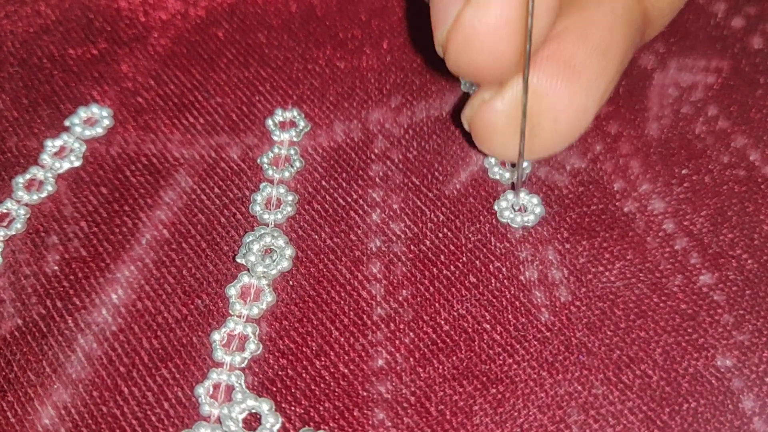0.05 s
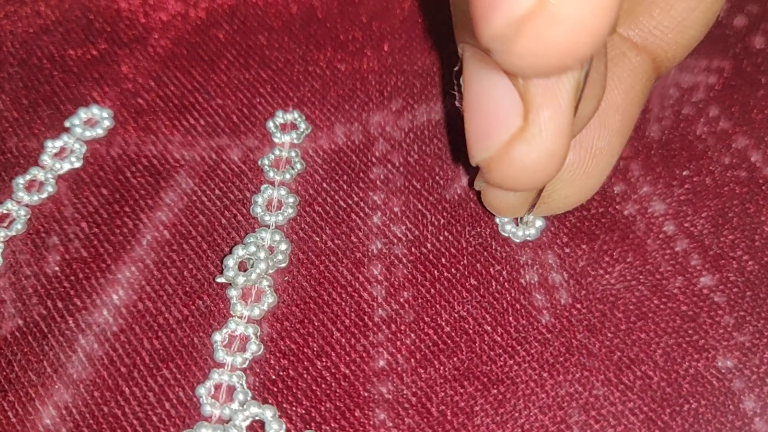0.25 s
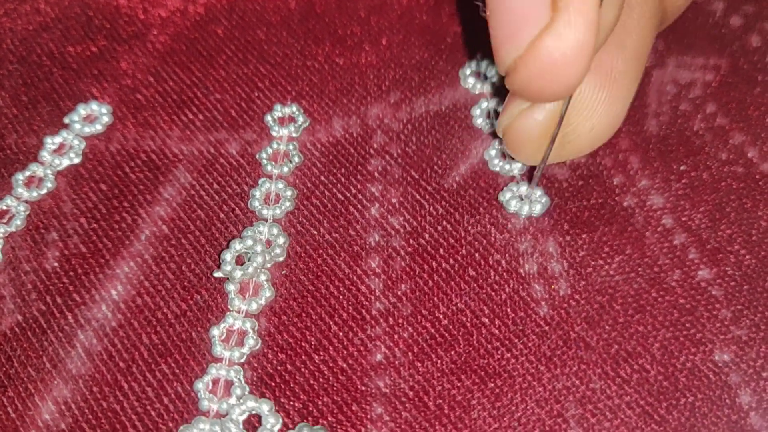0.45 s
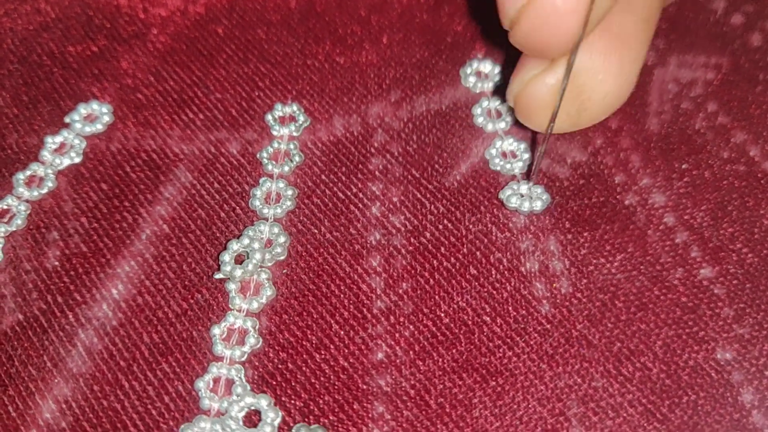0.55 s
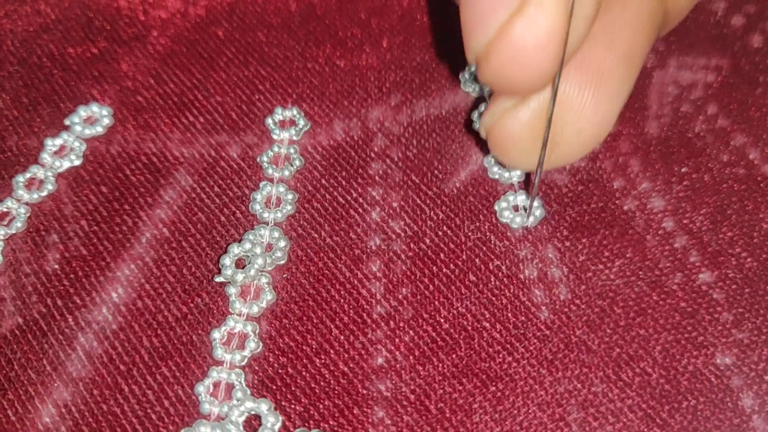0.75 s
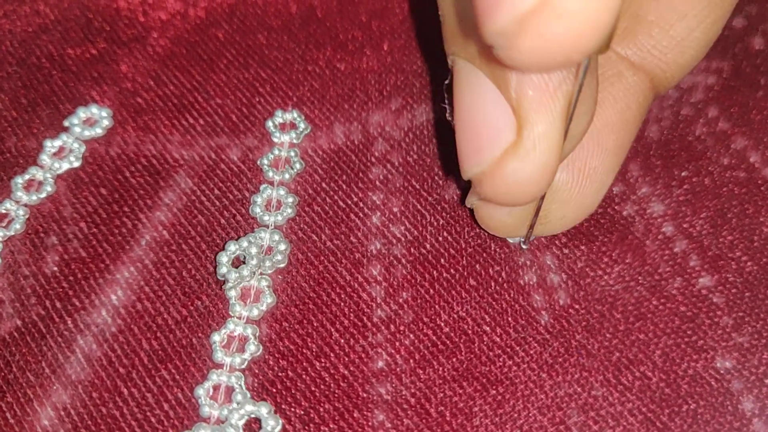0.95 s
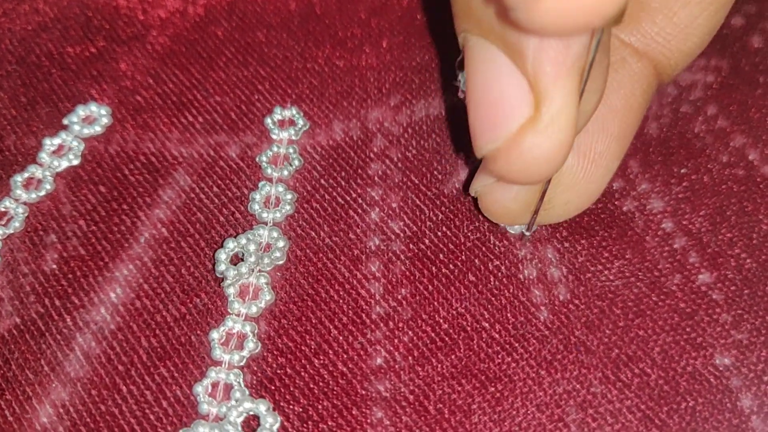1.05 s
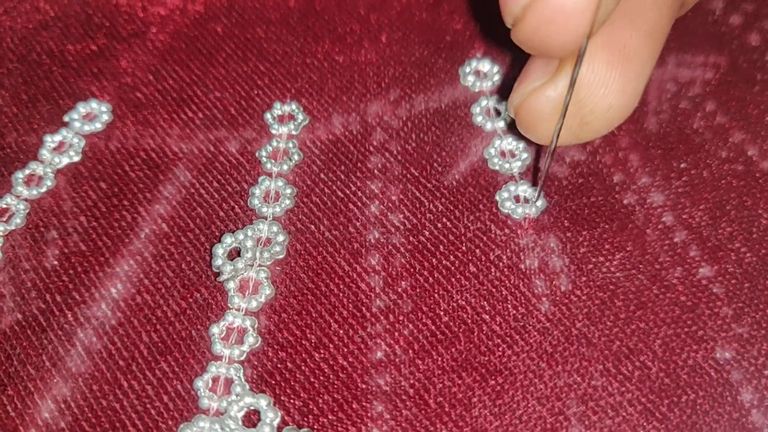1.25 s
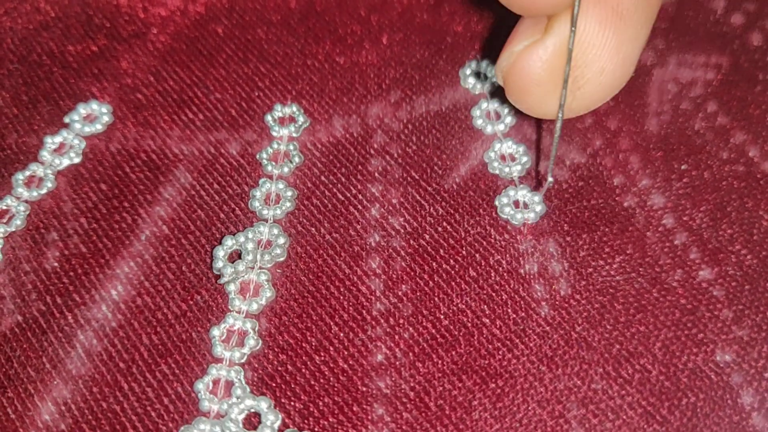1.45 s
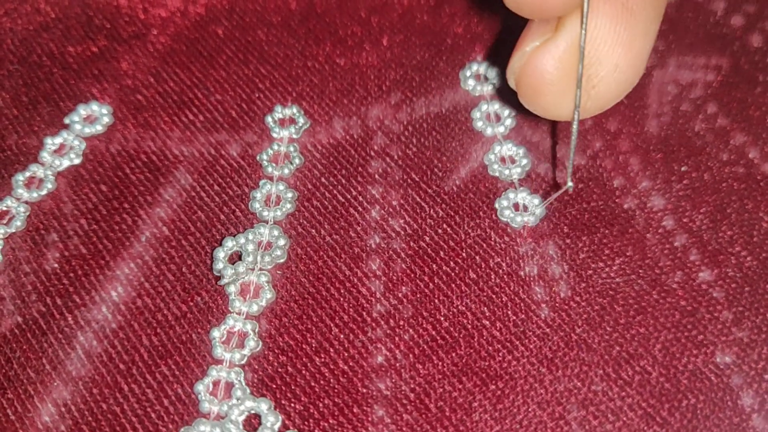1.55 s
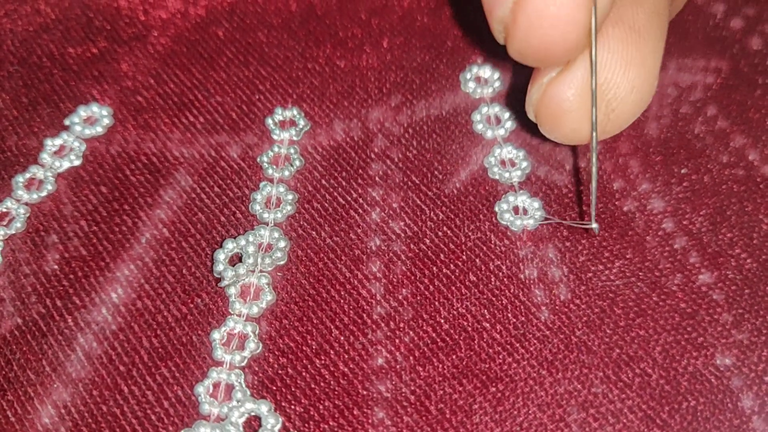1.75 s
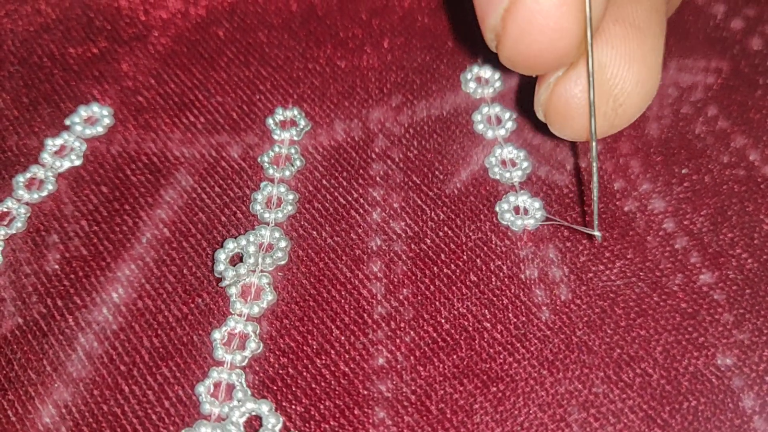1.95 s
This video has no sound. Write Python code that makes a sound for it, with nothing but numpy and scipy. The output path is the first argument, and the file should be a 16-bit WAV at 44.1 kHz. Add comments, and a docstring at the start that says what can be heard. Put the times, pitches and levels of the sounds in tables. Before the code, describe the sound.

A needle pops through taut fabric four times, with dry ticks and soft thumps.

```python
"""A quiet room, close to cloth stretched on an embroidery frame. A needle is pushed down and up, twice.
Each puncture snaps the threads and lets the cloth ring like a slack drum; the shaft then rasps through
the hole and slips free with a tick. The frame sways and rumbles under the hand. At the end the thread
is drawn up softly and the frame takes a light knock."""
import sys
import numpy as np
from scipy import signal
from scipy.fft import rfft, irfft
from scipy.io import wavfile

SR = 44100
rng = np.random.default_rng(int(sys.argv[2]) if len(sys.argv) > 2 else 0)


def unload_wav(signal):
    """Save mono or channel-first audio to the path in sys.argv[1] as 16-bit WAV at rate SR, clipped to [-1, 1]."""
    wavfile.write(
        sys.argv[1],
        SR,
        np.round(np.clip(np.atleast_2d(signal).T, -1, 1) * 32767).astype(np.int16),
    )


N = 88200


def undb(db):
    return 10 ** (np.asarray(db) / 20)


def unit(x):
    return x / np.std(x)


def since(start_s):
    """Seconds since start_s, zero before."""
    return np.maximum(np.arange(N) / SR - start_s, 0)


def swell(centre_s, half_s):
    """Gaussian rise and fall."""
    return np.exp(-((np.arange(N) / SR - centre_s) / half_s) ** 2)


def click(start_s):
    """One-sample impulse."""
    return np.diff(1. * (since(start_s) > 0), prepend=0)


def pan(right_db):
    """Left and right gains, left at unity."""
    return np.array([[1.], [undb(right_db)]])


def colour(x, points, size=8192):
    """Minimum-phase filter through (f/Hz, level/dB) points."""
    hz, db = np.array(points, float).T
    bins_hz = np.maximum(np.arange(size // 2 + 1) * SR / size, 1)
    gain = undb(np.interp(np.log(bins_hz), np.log(hz), db))
    cepstrum = irfft(np.log(gain))
    cepstrum[1:size // 2] *= 2
    cepstrum[size // 2 + 1:] = 0
    return signal.fftconvolve(x, irfft(np.exp(rfft(cepstrum))))[:N]


def fibre_noise(spectrum, catches_per_s=8000, roughness=0.15):
    """Friction as dense, uneven catches of fibres; rms 1."""
    hits = rng.random(N) < catches_per_s / SR
    catches = hits * rng.standard_normal(N) * np.exp(roughness * rng.standard_normal(N))
    return unit(colour(catches, spectrum))


def ring(modes, start_s, release_s, tilt_db_per_oct=0):
    """Modes swing freely once a load lets go. The right lags by a travel time, plus phase in the lows."""
    length_s, right_lag_s, low_lag_rad, low_corner_hz = 0.3, 0.00022, 0.8, 200
    first = int(start_s * SR)
    span = np.arange(first, min(first + int(length_s * SR), N))
    t = np.maximum(span / SR - start_s - np.array([[0], [right_lag_s]]), 0)
    out = np.zeros((2, N))
    for hz, db, t60_s, right_db in modes:
        gain = pan(right_db) * undb(db + tilt_db_per_oct * np.log2(hz / 1000))
        lag_rad = np.array([[0], [low_lag_rad]]) / (1 + (hz / low_corner_hz) ** 4)
        out[:, span] += gain * np.cos(2 * np.pi * hz * t - lag_rad) * undb(-60 * t / t60_s)
    out[:, span] *= 1 - np.exp(-t / release_s)
    return out


# Room tone spectra: f/Hz, level/dB
AIR_LEFT = [(20, 22.5), (60, 5.5), (120, 1), (250, -4), (480, -7.5), (700, -7.5), (1000, -7), (2000, -15),
            (4500, -19), (6300, -12), (7500, -23.5), (10500, -29), (15500, -30.5)]
AIR_RIGHT = [(20, 21.5), (60, 26), (120, 5.5), (250, -5), (480, -3), (700, -14), (1000, -10.5),
             (2000, -16.5), (4500, -18.5), (6300, -20.5), (8700, -23.5), (10500, -29), (15500, -29)]
# Far tones: t/s, half-length/s, f/Hz, level/dB
FAR_TONES = [(0.842, 0.11, 1085, -65.5), (1.51, 0.13, 472, -60)]


def room(air_db=-43, shared_power=0.45, shared_below_hz=800, hum_hz=100, hum_db=-54):
    """Room tone, its lows partly common to both sides, with mains hum and two faint far tones."""
    t = since(0)
    lowpass = signal.butter(2, shared_below_hz, fs=SR, output="sos")
    shared = np.sqrt(shared_power) * signal.sosfilt(lowpass, rng.standard_normal(N))
    air = np.array([colour(shared + np.sqrt(1 - shared_power) * rng.standard_normal(N), side)
                    for side in (AIR_LEFT, AIR_RIGHT)])
    hum = undb(hum_db) * np.sin(2 * np.pi * hum_hz * t)
    tones = sum(undb(db) * swell(centre_s, half_s) * np.sin(2 * np.pi * hz * t)
                for centre_s, half_s, hz, db in FAR_TONES)
    return undb(air_db) * unit(air) + hum + tones


# Sliding thread spectrum: f/Hz, level/dB
THREAD_SPECTRUM = [(300, -40), (1000, 14), (3000, 6.5), (6000, 9.5), (8500, 3.5), (10500, -7.5),
                   (15500, -1)]


def thread_draw(centre_s=2, half_s=0.3, level_db=-62.5):
    """Thread hisses as it is drawn up through the cloth."""
    hiss = np.array([fibre_noise(THREAD_SPECTRUM) for _ in range(2)])
    return undb(level_db) * swell(centre_s, half_s) * hiss


# Rub strokes: t/s, half-length/s, level/dB
RUB_STROKES = [(0.028, 0.14, -54.5), (0.128, 0.0057, -50), (0.48, 0.03, -48), (1.055, 0.023, -56),
               (1.178, 0.021, -44.5)]
# Rub spectrum: f/Hz, level/dB
RUB_SPECTRUM = [(100, 9.5), (400, 4.5), (900, 4), (1400, -6.5), (3000, -17.5), (6300, -21.5), (9000, -29.5),
                (15500, -50)]


def rubbing():
    """Needle tip and fingers feel over the cloth."""
    envelope = sum(undb(db) * swell(centre_s, half_s) for centre_s, half_s, db in RUB_STROKES)
    return pan(right_db=-9.5) * envelope * fibre_noise(RUB_SPECTRUM)


# Frame modes: f/Hz, level/dB, t60/s, right-left/dB
FRAME_MODES = [(464, -2, .035, 1), (525, -1.5, 0.012, 0.5), (1100, -20, .008, -1), (3300, -5.5, .007, -4)]


def frame_knock(level_db=-32.5):
    """A light knock rings the frame."""
    return undb(level_db) * ring(FRAME_MODES, start_s=1.9705, release_s=0.0001)


# Needle and finger presses from below: t/s, half-length/s, level/dB
CLOTH_PRESSES = [(0.521, 0.014, -7.5), (0.622, 0.003, -20), (1.217, 0.013, -6.5)]


def frame_motion(sway_hz=12, crest_s=0.19, sway_db=-13, rumble_db=-25.5):
    """Each push sets the frame swaying and rumbling, mostly on the left; presses bulge the cloth."""
    def shaken(decay_s, rise_s=0.0041):
        ages = [since(start_s) for start_s, *_ in STITCHES]
        return sum((1 - np.exp(-t / rise_s)) * np.exp(-t / decay_s) for t in ages)

    # f/Hz, level/dB
    spectrum = [(5, -14), (14, -37), (20, 3.5), (45, -1.5), (65, -11.5), (90, -20), (130, -31.5),
                (300, -38.5), (1000, -94)]
    noise = unit(colour(rng.standard_normal(N), spectrum))
    rumble = undb(rumble_db) * noise * (0.11 + shaken(decay_s=0.17))
    swing = np.cos(2 * np.pi * sway_hz * (since(0) - crest_s))
    sway = undb(sway_db) * swing * (0.12 + shaken(decay_s=0.24))
    bulge = sum(undb(db) * swell(centre_s, half_s) for centre_s, half_s, db in CLOTH_PRESSES)
    return pan(right_db=-27) * (sway + rumble - bulge)


# Shaft rasp spectrum: f/Hz, level/dB
RASP_SPECTRUM = [(200, 10.5), (900, 5), (2000, 3.5), (3200, -1.5), (4500, -2), (6400, 5), (7500, -6.5),
                 (9000, -11.5), (10300, -44), (15500, -39)]


def shaft_rasp(stop_s=0.0036, trail_db=-57, trail_fade_db_per_s=60):
    """The shaft rasps in the hole; thread runs on softly after a downward stitch."""
    envelope = 0
    for start_s, direction, *_, rasp_db, length_s, fade_db_per_s in STITCHES:
        t = since(start_s)
        shaft = undb(rasp_db - fade_db_per_s * t) * np.exp(-since(start_s + length_s) / stop_s)
        trail = (direction > 0) * undb(trail_db - trail_fade_db_per_s * t)
        envelope += (t > 0) * (shaft + trail)
    return pan(right_db=-14) * envelope * fibre_noise(RASP_SPECTRUM)


# Tip click spectrum: f/Hz, level/dB
TIP_SPECTRUM = [(200, -39), (6000, -30), (9000, 12.5), (11000, -10), (13000, -2), (15000, -2), (16300, -2)]


def tip_click(start_s):
    """The needle tip gives one bright click."""
    return colour(click(start_s), TIP_SPECTRUM)


# Thread snap spectra: f/Hz, level/dB
SNAP_SPECTRUM_LEFT = [(200, -16), (800, 2.5), (1800, -16.5), (2400, -0.5), (2800, -11), (3500, -2.5),
                      (5000, -7.5), (6200, 6.5), (7200, -6.5), (8400, -19), (10000, -49), (15500, -29.5)]
SNAP_SPECTRUM_RIGHT = [(200, 5.5), (800, -4.5), (1800, -17), (3500, -25), (5000, -24.5), (6200, -11),
                       (7500, -9.5), (8800, -8), (10200, -38), (15500, -44.5)]


def thread_snap(start_s, decay_s, break_gain=2.27):
    """Threads snap aside: one sharp break, then a tiny burst of fibres."""
    t = since(start_s)
    fibres = (t > 0) * np.exp(-t / decay_s) * np.sign(rng.standard_normal(N))
    crack = break_gain * click(start_s) + fibres
    return np.array([colour(crack, SNAP_SPECTRUM_LEFT), colour(crack, SNAP_SPECTRUM_RIGHT)])


# Slips: t/s, ring/dB, snap/dB, snap decay/s, tip/dB
NEEDLE_SLIPS = [(0.2923, -48, -39.5, 0.005, -68), (0.2946, -24, -38, 0.0059, -51),
                (0.5513, -17.5, -27.5, 0.0012, -58), (0.5969, -15.5, -29, 0.0019, -37.5),
                (0.9669, -43, -38, .002, -68), (0.9831, -21.5, -37, 0.0024, -53),
                (1.2331, -23, -25.5, 0.0016, -55)]


def slips():
    """Needle and thread slip with a tick, lightly ringing the cloth."""
    out = np.zeros((2, N))
    for start_s, ring_db, snap_db, decay_s, tip_db in NEEDLE_SLIPS:
        out += undb(ring_db) * ring(CLOTH_MODES, start_s, release_s=0.00017, tilt_db_per_oct=1)
        out += undb(snap_db) * thread_snap(start_s, decay_s)
        out += undb(tip_db) * tip_click(start_s)
    return out


# Cloth modes: f/Hz, level/dB, t60/s, right-left/dB
CLOTH_MODES = [(157.2, -19, 0.07, -3.5), (210.5, -28, 0.11, -3.5), (292, -25.5, 0.061, -3),
               (326, -22, 0.055, -25), (371.5, -44.5, 0.15, 1), (432.7, -24.5, 0.061, -31),
               (536, -31, 0.06, -28), (753, -18.5, 0.026, -9.5), (874, -27.5, 0.014, -11),
               (1033, -47.5, 0.075, -1.5), (1450, -40, 0.055, -5), (2305, -37.5, 0.026, -14)]
# Deep modes of cloth and frame together: f/Hz, level/dB, t60/s, right-left/dB
THUMP_MODES = [(32.4, -18, 0.26, -41), (46.9, -8, .14, -52), (78.8, -29.5, 0.4, -34)]
# Needle passes: t/s, direction (signed gain, + down), ring/dB, thump/dB, release/s, snap/dB,
# snap decay/s, tip/dB, rasp/dB, rasp length/s, rasp fade/(dB/s)
STITCHES = [(0.2258, 0.92, 3, 10, 0.00025, -21, 0.0024, -34, -45, 0.04, 121),
            (0.5463, -1.71, -6, -4, 0.0012, -29.5, 0.0015, -58, -48, 0.028, 398),
            (0.9149, 1, -5, 3.5, 0.00013, -22.5, 0.0027, -41, -48.5, 0.04, 151),
            (1.2277, -1.07, -1.5, 2, 0.00044, -8.5, 0.0011, -21.5, -44.5, 0.023, 497)]


def punctures():
    """The tip clicks through, threads snap, and the released cloth rings and thumps."""
    out = np.zeros((2, N))
    for start_s, direction, ring_db, thump_db, release_s, snap_db, decay_s, tip_db, *_ in STITCHES:
        cloth = undb(ring_db) * ring(CLOTH_MODES, start_s, release_s)
        thump = undb(thump_db) * ring(THUMP_MODES, start_s, release_s=0.0057)
        snap = undb(snap_db) * thread_snap(start_s, decay_s)
        out += direction * (cloth + thump + snap) + undb(tip_db) * tip_click(start_s)
    return out


def scene():
    """Needle, friction, frame and room, in stereo."""
    needle = punctures() + slips()
    friction = thread_draw() + shaft_rasp() + rubbing()
    return needle + friction + frame_motion() + frame_knock() + room()


def record(dry):
    """Steep low-pass."""
    top_hz = 16300
    return signal.sosfilt(signal.ellip(8, 0.2, 70, top_hz, fs=SR, output="sos"), dry)


dry = scene()
out = record(dry)
unload_wav(out)
```